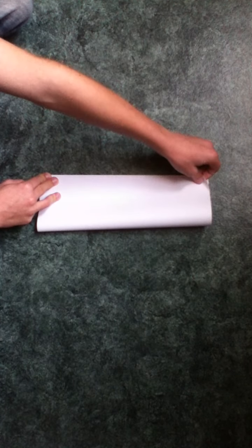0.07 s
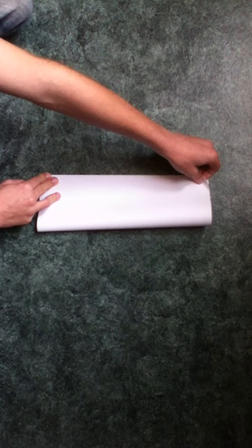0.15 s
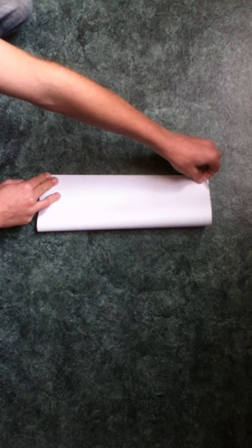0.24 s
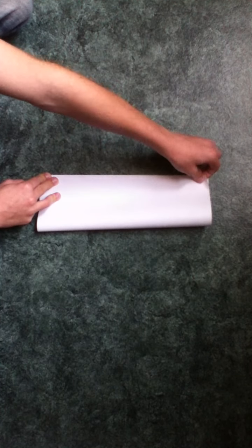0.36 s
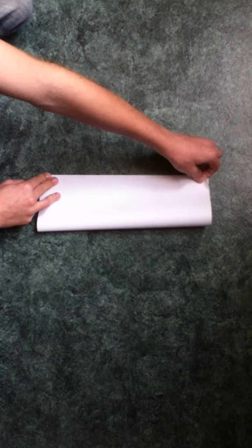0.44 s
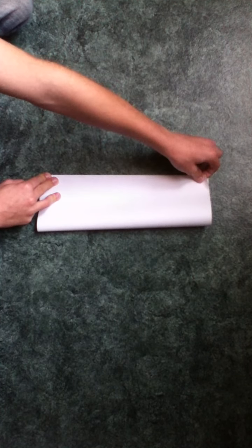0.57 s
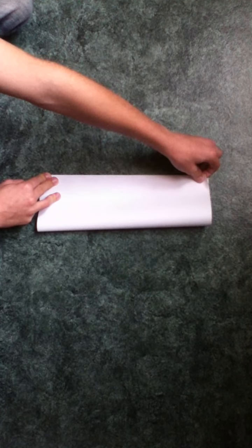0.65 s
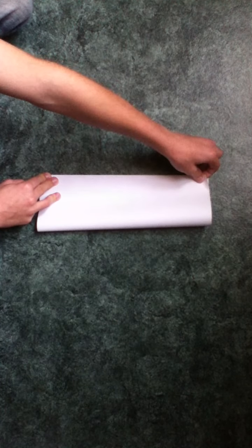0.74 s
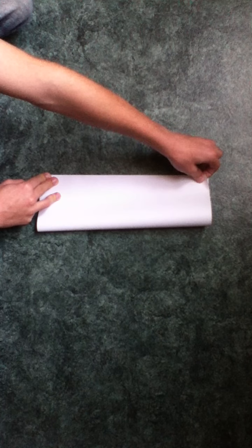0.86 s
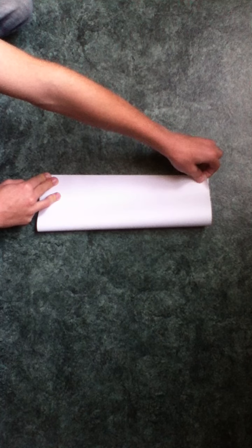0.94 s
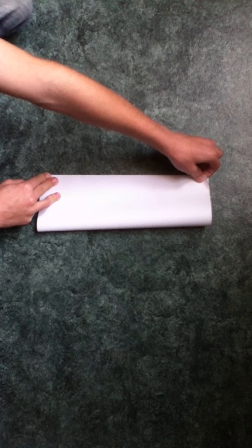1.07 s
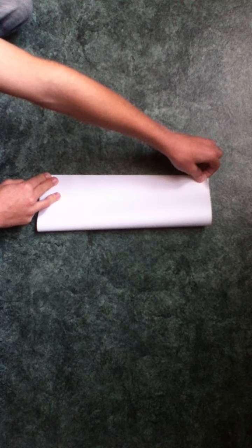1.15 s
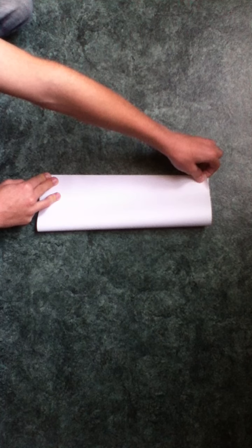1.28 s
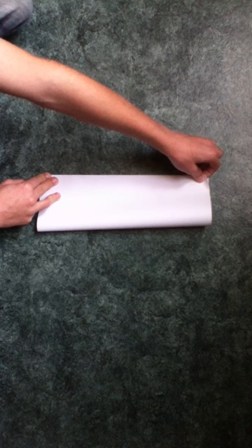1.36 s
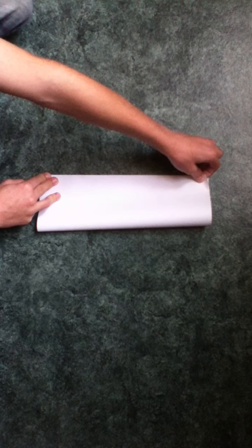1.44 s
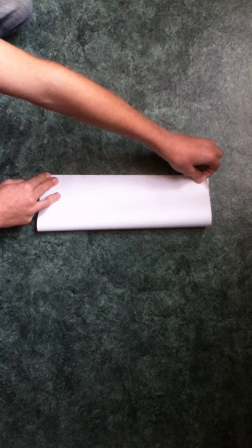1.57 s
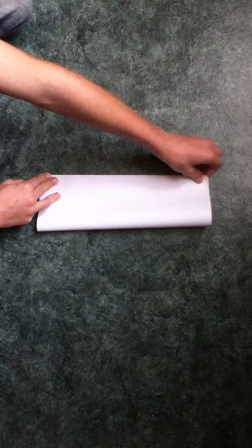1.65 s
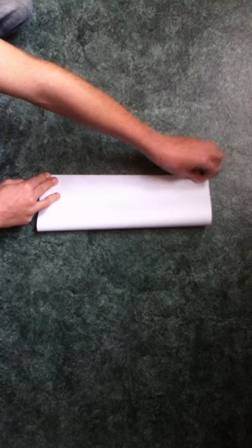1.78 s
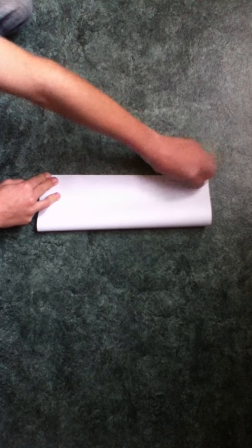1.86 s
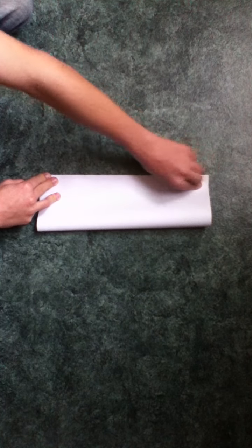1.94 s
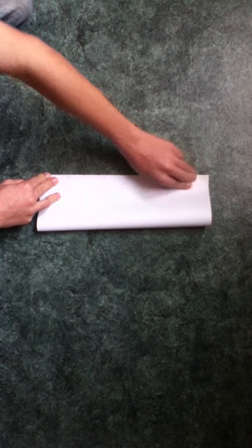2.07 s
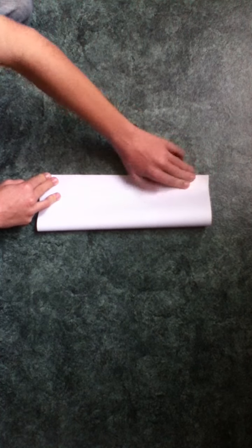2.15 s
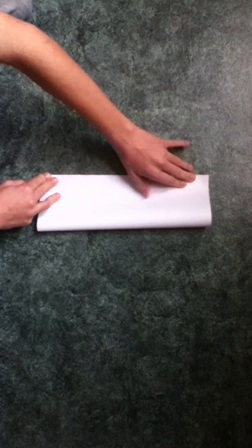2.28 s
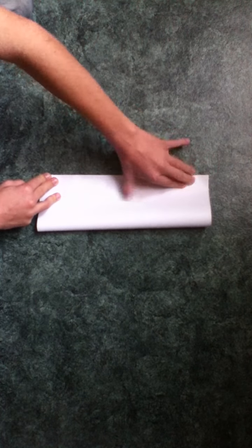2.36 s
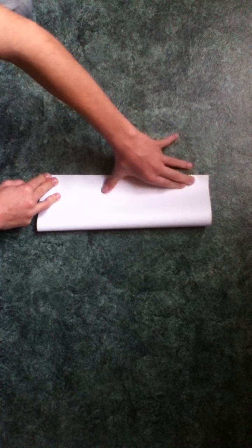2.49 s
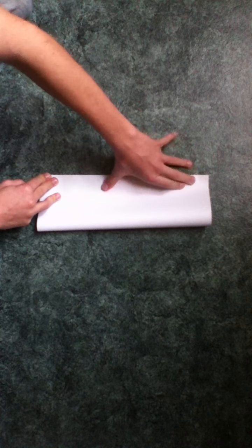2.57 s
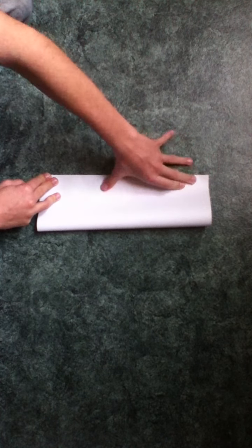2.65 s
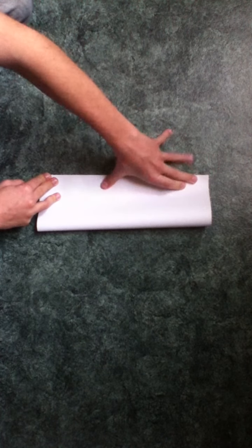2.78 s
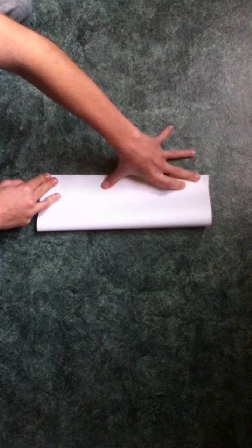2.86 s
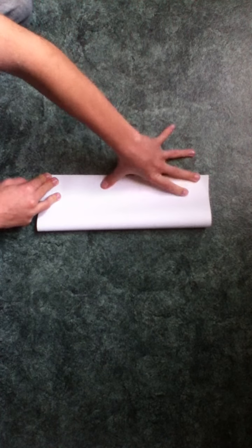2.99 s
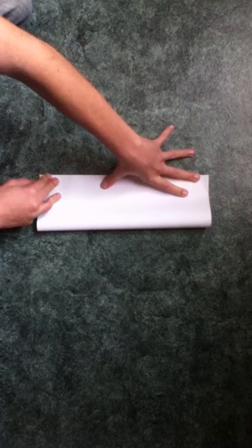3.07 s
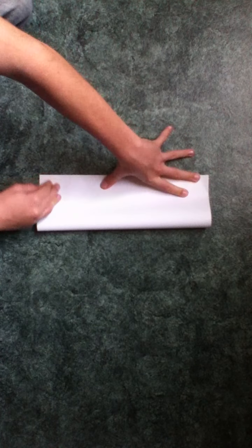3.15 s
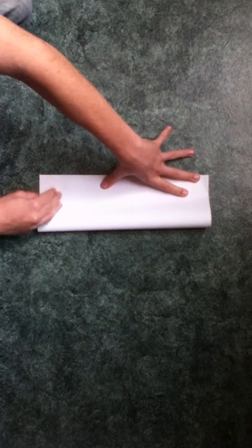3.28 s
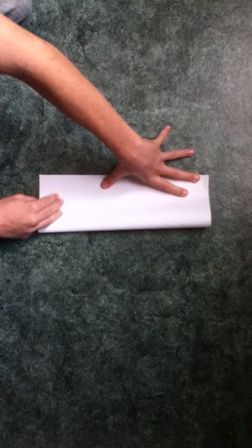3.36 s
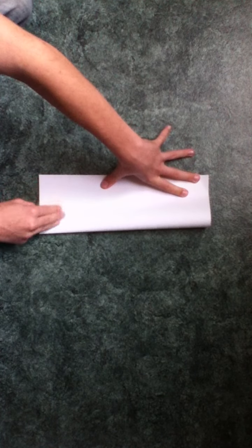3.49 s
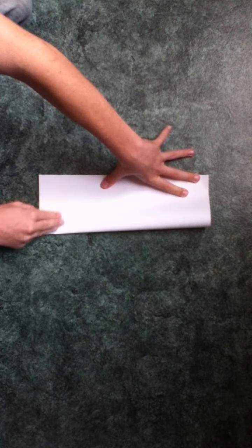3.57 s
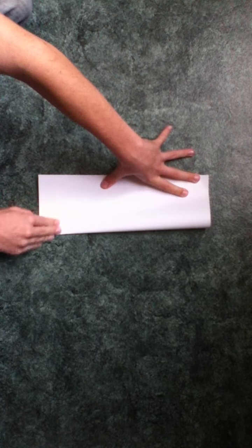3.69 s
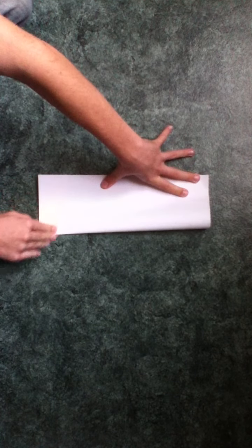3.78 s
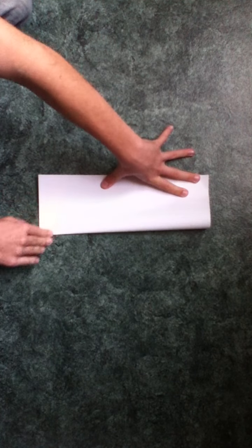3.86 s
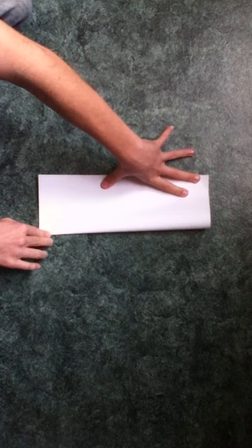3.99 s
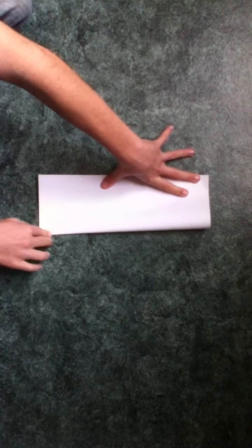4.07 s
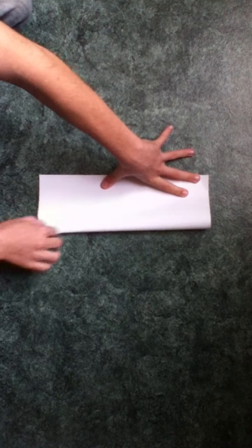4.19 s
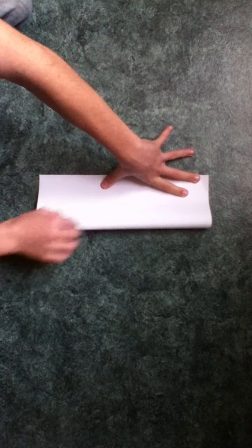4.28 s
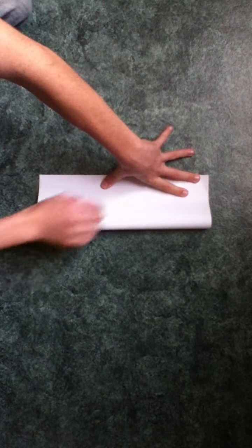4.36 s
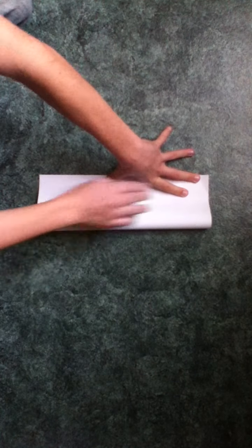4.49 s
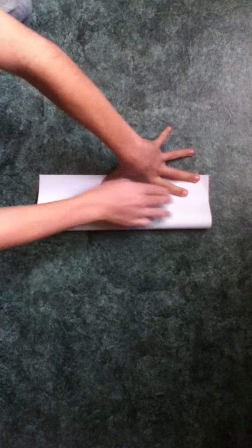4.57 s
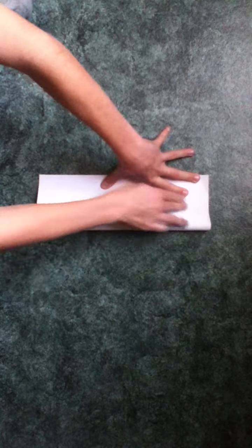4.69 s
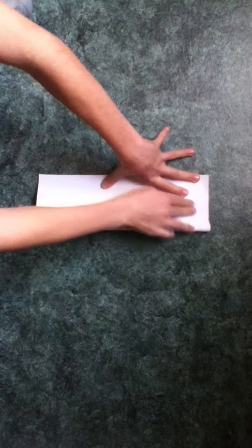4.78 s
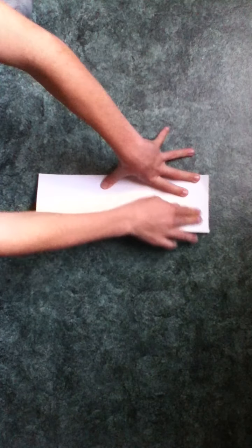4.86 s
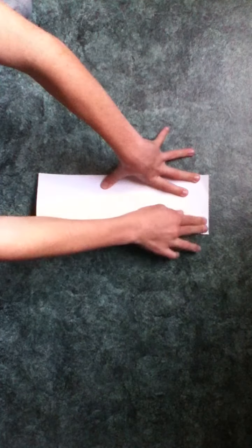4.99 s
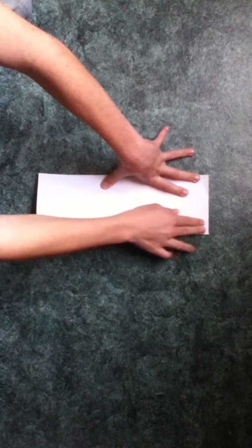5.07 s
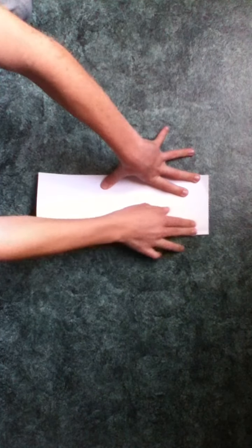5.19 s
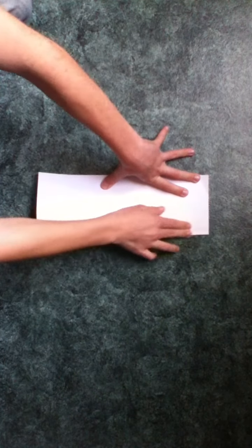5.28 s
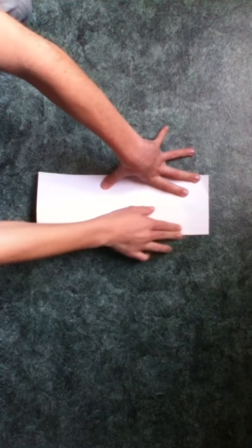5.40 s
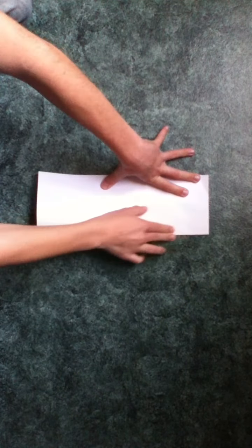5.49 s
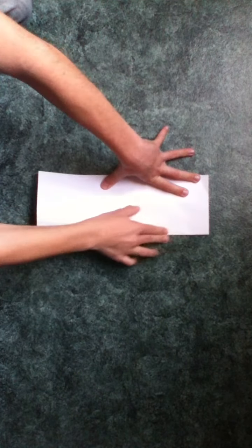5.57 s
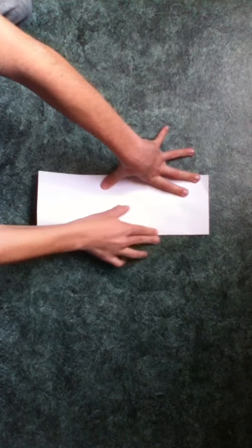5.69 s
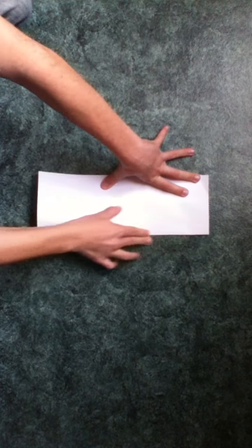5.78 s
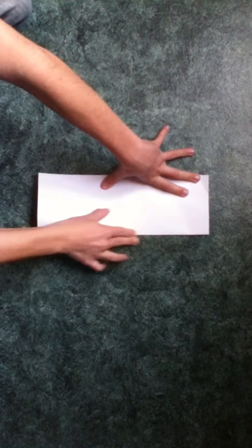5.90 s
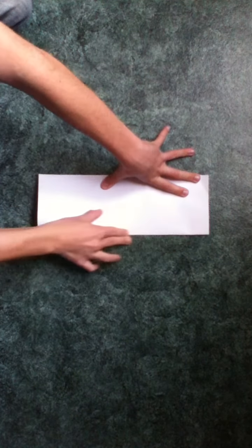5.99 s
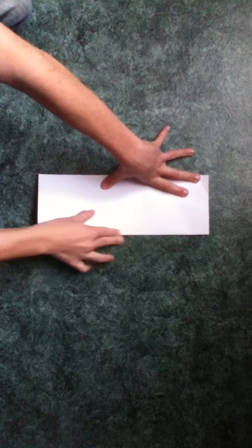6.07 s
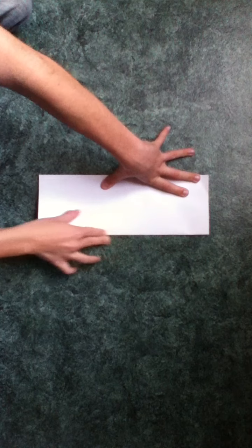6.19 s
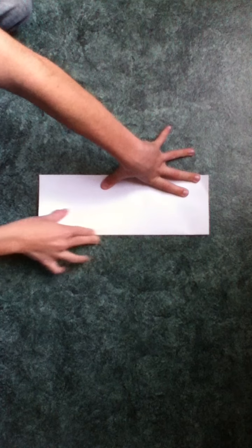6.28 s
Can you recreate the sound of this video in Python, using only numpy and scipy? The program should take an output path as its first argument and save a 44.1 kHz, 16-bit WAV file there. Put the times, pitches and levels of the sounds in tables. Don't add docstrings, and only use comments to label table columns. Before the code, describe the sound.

A close phone microphone in a small carpeted room, with low rumble, a faint building drone and light hiss throughout. At 0 s a soft fingertip push, then a quick brush at 0.2 s with small creaks. Mostly quiet until faint ticks around 0.7 and 1.3-1.45 s. At 1.65 s a bright, sharp snap with a dull thump, another lower snap at 1.83 s, then hissing slides and hollow paper drumming from 1.85 to 2.5 s. Lighter brushes and an airy flick near 3 s, a creak at 3.2 s, then overlapping rubs to 3.9 s. A crisp crease at 3.7 s, the loudest crack at 3.93 s, and a firm push with another hard snap at 4.18 s, each with a short room echo. A low soft thump at 4.55 s, tiny clicks at 4.64 s, then short slides and long, gentle smoothing hisses until 6.4 s, with one faint creak at 5.7 s.

```python
import sys
import numpy as np
from scipy import signal
from scipy.fft import rfft, irfft
from scipy.io import wavfile
from scipy.ndimage import uniform_filter1d

SR = 44100
rng = np.random.default_rng(int(sys.argv[2]) if len(sys.argv) > 2 else 0)


def digitize_waveform(pressure):
    field = np.atleast_2d(pressure).T
    bounded = np.clip(field, -1, 1)
    quanta = np.round(bounded * 32767).astype(np.int16)
    wavfile.write(sys.argv[1], SR, quanta)


def elevation(decibels):
    levels = np.asarray(decibels, float)
    return 10 ** (levels / 20)


N = 279594

# (frequency [Hz], density [dB per Hz])
SKIN_HISS = [(1760, -16.5), (3000, -9), (3940, -7), (4610, -2.5), (6250, -2), (7440, -3.5), (8900, -2.5),
             (11000, -18.5), (14300, -70), (22000, -120)]
# (frequency [Hz], density [dB per Hz])
SKIN_FIZZ = [(8000, -23), (10000, -4.5), (11500, -3), (13000, -4), (14500, -9), (16000, -15)]
# (frequency [Hz], width [Hz], level [dB])
SHEET_MODES = [(1320, 450, 6), (1590, 490, 12.5), (1970, 300, 10), (2300, 760, 13), (2750, 710, -4)]
# (time [s], pitch [Hz])
FREE_PANEL = [(0.23, 1720), (0.3, 1300), (1.45, 1300), (1.6, 1850), (1.7, 1490), (2.05, 1860), (2.15, 1540),
              (2.23, 1300), (2.37, 1340), (2.45, 1780), (3.19, 1790), (3.3, 1600), (3.56, 2420),
              (3.75, 1810), (4.6, 2000), (4.85, 2170), (5.2, 2350), (5.35, 2000)]
SKIN_HZ, LARGE_PANEL_HZ = 5770, 1460
SHEET_LOW_HZ = 1050


def rubbing():
    sheet_level, hiss_level, whistle_level, fizz_level = strokes()
    fine, coarse = slips(20000, .9, 0.17), slips(5000, 1.8, 0.24)
    hiss = coloured(fine, SKIN_HISS)
    fizz = coloured(fine, SKIN_FIZZ)
    whistle = evened(sweep(fine, np.full(N, SKIN_HZ), 2660))
    held = sum(elevation(db) * resonate(resonate(coarse, hz, w), hz, 3 * w) for hz, w, db in SHEET_MODES)

    free_hz = np.interp(np.arange(N) / SR, *np.transpose(FREE_PANEL))
    free = evened(sweep(coarse, free_hz, 890))
    large = np.clip((LARGE_PANEL_HZ - free_hz) / 150, 0, 1)
    clear = large * evened(sweep(coarse, free_hz, 170))
    panels = evened(held) + elevation(-4.5) * free + elevation(-5.0) * clear
    panels = signal.sosfilt(signal.butter(4, SHEET_LOW_HZ, "high", fs=SR, output="sos"), panels)

    rub = hiss_level * patchy(hiss, 0.65)
    rub += sheet_level * patchy(panels, 2.2)
    rub += fizz_level * patchy(fizz, 1.8)
    return rub + elevation(-9.0) * whistle_level * patchy(whistle, 1.7)


# (peak time [s], rise [s], fall [s], hiss level [dB], sheet drumming relative to hiss [dB])
PRESSES = [
    (0.024, 0.026, .05, -57.5, -2),
    (0.17, 0.13, .15, -64, 5),
    (1.39, 0.01, .16, -63, 4),
    (1.538, .045, 0.34, -55, -14),
    (1.788, .02, 0.2, -57.5, -8),
    (4.166, 0.0066, 0.065, -41.5, -23),
    (4.565, 0.13, .4, -54, -6),
]
# (peak time [s], rise [s], fall [s], hiss level [dB], sheet drumming relative to hiss [dB])
BRUSHES = [(0.21, 0.048, .035, -44.5, -11), (1.64, 0.032, 0.089, -52, -15), (2.154, 0.051, 0.12, -49, 1.5),
           (2.29, 0.14, 0.12, -56, 10.5), (2.405, 0.091, 0.29, -53, -24), (2.526, .02, 0.081, -58, -11),
           (2.684, 0.05, 0.084, -57.5, -18), (2.82, .25, 0.029, -60.5, -13),
           (2.915, 0.0057, 0.16, -47, -31), (2.97, 0.11, 0.11, -63, 1.5), (4.128, 0.055, 0.039, -54, 2.5),
           (4.2, 0.069, .1, -51.5, 5.5), (4.7, .05, .2, -58, -15), (5.436, 0.29, 0.2, -53, -11)]
# (peak time [s], rise [s], fall [s], hiss level [dB], sheet
# drumming relative to hiss [dB])
SKIMS = [
    (3.033, 0.04, 0.014, -53.5, -1),
    (3.14, 0.1, 0.12, -56.5, -23),
]
# (start [s], end [s], hiss at start [dB], hiss at end [dB], sheet drumming relative to hiss [dB])
SLIDES = [(1.686, 1.77, -66, -70, 0), (1.844, 2.15, -59, -51.5, -9), (2.251, 2.386, -51.5, -52.5, -5.5),
          (3.15, 3.193, -64, -53, -23), (3.2, 3.343, -48, -49.5, -1.5), (3.366, 3.524, -52.5, -49.5, -0.5),
          (3.547, 3.808, -50, -54, -8.5), (3.804, 3.91, -59, -60, -10), (4.664, 4.726, -55, -56, -7),
          (4.748, 4.855, -53.5, -53.5, -8), (4.868, 4.961, -55.5, -56, -3),
          (5.012, 5.517, -55, -57.5, -5.5), (5.537, 6.4, -56, -56, -9)]
# broad hiss [dB], skin whistle [dB], fizz [dB]
PRESS_DB, BRUSH_DB, SKIM_DB, SLIDE_DB = (-5.5, 1.5, -18), (0.3, -4.5, -7), (-.3, .3, 2.5), (-1, -0.7, -6)
SWELL_DB, EDGE_S = 23, 0.04


def strokes():
    t, power = np.arange(0, N / SR + .002, .002), 0
    for table, kind_db in [(PRESSES, PRESS_DB), (BRUSHES, BRUSH_DB), (SKIMS, SKIM_DB)]:
        for s, rise, fall, db, sheet_db in table:
            swell_db = db - SWELL_DB * np.maximum((s - t) / rise, (t - s) / fall)
            power += np.outer(elevation([sheet_db, *kind_db]), elevation(swell_db)) ** 2
    for start, end, from_db, to_db, sheet_db in SLIDES:
        off = np.maximum(np.maximum(start - t, t - end), 0) / EDGE_S
        slide_db = np.interp(t, [start, end], [from_db, to_db]) - SWELL_DB * off
        power += np.outer(elevation([sheet_db, *SLIDE_DB]), elevation(slide_db)) ** 2
    return [np.interp(np.arange(N) / SR, t, np.sqrt(p)) for p in power]


def slips(per_s, spread_db, flutter_db):
    sizes = elevation(spread_db * np.minimum(rng.exponential(1, N), 4)) * rng.standard_normal(N)
    clumps = evened(uniform_filter1d(uniform_filter1d(rng.standard_normal(N), size=700), size=700))
    return sizes * (rng.random(N) < per_s / SR) * elevation(flutter_db * clumps)


def patchy(x, patchy_db):
    z = signal.stft(x, nperseg=512)[2]
    field = rng.standard_normal(z.shape)
    field = evened(uniform_filter1d(uniform_filter1d(field, size=7, axis=0), size=12, axis=1))
    return evened(signal.istft(z * elevation(patchy_db * field), nperseg=512)[1][:N])


# (time [s], peak level [dB], panel pitch [Hz], room share [dB])
CREAKS = [(0.231, -43.5, 1120, -3), (0.284, -47.5, 1050, 2.5), (0.688, -45, 999, -0.5),
          (1.293, -49, 1190, 1), (1.389, -50, 1190, 5), (1.445, -44.5, 1220, -3), (1.788, -51, 1280, 3),
          (2.914, -52, 1200, 7), (3.019, -49, 1970, 9), (3.188, -36, 1580, 10), (4.129, -39.5, 1470, 4.5),
          (5.719, -46, 1700, -12)]
# (time [s], peak level [dB], panel pitch [Hz], crack share [dB], room share [dB])
BUCKLES = [(1.6526, -21, 7150, -18, -12), (1.6527, -30, 12500, -15, -7), (1.6532, -35.5, 1040, -22, -7.5),
           (1.6543, -27, 4500, -13, -4), (1.8262, -31, 1156, -8, -5.5), (1.8275, -34.5, 2750, -8, 0),
           (1.8295, -34, 1280, -31, -24), (1.841, -37, 1050, -25, -21), (3.6983, -35.5, 1030, -22, -6.5),
           (3.7011, -26, 2030, -10, 1.5), (3.9321, -12.5, 1425, -2, -4.5), (3.9331, -18.5, 2080, -16, 5),
           (3.9347, -15.5, 2750, -3.5, 1), (2.8942, -39, 6000, -15, -11), (3.6995, -38, 2350, -20, -8),
           (3.0815, -40.5, 6100, -15, -9), (3.198, -31.5, 2000, -20, -4), (4.5548, -45.5, 950, -20, -2),
           (4.6352, -40, 1220, -20, 0), (4.6355, -41, 2400, -20, -9), (4.1797, -20, 1490, -2.5, -4.5),
           (4.1776, -17.5, 2600, -17, -4.5), (4.178, -31.5, 920, -20, -7.5), (4.177, -23, 3750, -20, 4)]
CREAK_WIDTH_HZ, CREAK_CRACK_DB, CRACK_DB_PER_OCTAVE = 580, 2, -7
WIDTH_SHARE = 0.47


def snaps():
    near, far, t = np.zeros(N), np.zeros((3, N)), np.arange(1500) / SR
    first_kick = 1. * (t == 0)
    rush = .2 * np.exp(-t / .0008)
    rows = []
    for s, db, hz, room_db in CREAKS:
        crack_db = CREAK_CRACK_DB + CRACK_DB_PER_OCTAVE * np.log2(hz / 1000)
        rows.append((s, db, hz, CREAK_WIDTH_HZ, crack_db, room_db))
    for s, db, hz, crack_db, room_db in BUCKLES:
        rows.append((s, db, hz, WIDTH_SHARE * hz, crack_db, room_db))
    for k, (s, db, hz, width, crack_db, room_db) in enumerate(rows):
        at = round(s * SR)
        kicks = first_kick + rng.standard_normal(1500) * rush
        near[at:at + 1500] += elevation(db) * buckle(kicks, hz, width, crack_db)
        far[k % 3, at:at + 1500] += elevation(db + room_db) * buckle(first_kick, hz, width, crack_db + 3.5)
    return near, far


# (frequency [Hz], width [Hz], level [dB])
FIBRE_CRACK = [(5010, 1700, 16), (6100, 420, 14), (8000, 350, 5)]


def buckle(kicks, panel_hz, width, crack_db):
    panel = resonate(resonate(kicks, panel_hz, width), panel_hz, 0.84 * width)
    crack = sum(elevation(db) * resonate(resonate(kicks, hz, w), hz, w) for hz, w, db in FIBRE_CRACK)
    sound = panel / abs(panel).max() + elevation(crack_db) * crack / abs(crack).max()
    return sound / abs(sound).max()


# (time [s], peak level [dB], pitch [Hz])
THUMPS = [
    (1.653, -43, 597),
    (1.826, -40, 450),
    (3.698, -40.5, 426),
    (3.932, -41.5, 460),
    (4.177, -42, 400),
    (4.545, -40, 317),
]


def landings():
    out, t = np.zeros(N), np.arange(1500) / SR
    for s, db, hz in THUMPS:
        out[round(s * SR):][:1500] += elevation(db) * np.sin(2 * np.pi * hz * t) * np.exp(-t * hz * 1.5)
    return out


# (frequency [Hz], t60 [s])
ROOM_T60 = [(400, 0.26), (1300, 0.24), (3500, 0.34), (9000, 0.19), (15000, 0.033)]
# (frequency [Hz], level [dB])
ROOM_TONE = [(300, -5), (1000, 3.5), (3000, -10.5), (6000, -8), (12000, 5.5)]


def room(x):
    taps = np.zeros(SR // 2)
    at = np.arange(150, len(taps) - 20, 20)
    taps[at + rng.integers(0, 20, len(at))] = rng.choice([-1., 1.], len(at))
    hz, t, z = signal.stft(taps, SR, nperseg=128)
    shape_db = read(ROOM_TONE, hz)[:, None] - 60 * t / read(ROOM_T60, hz)[:, None]
    tail = signal.istft(z * elevation(shape_db), SR, nperseg=128)[1]
    return signal.fftconvolve(x, tail / np.linalg.norm(tail))[:N]


# (frequency [Hz], density [dB per Hz])
AIR_COLOUR = [(12, -14.5), (20, -1), (36, -3), (193, -15), (234, -17.5), (285, -19), (1090, -27.5),
              (1570, -28.5), (1910, -29), (2600, -29), (3340, -29.5), (5230, -30), (16000, -34.5)]
AIR_DB = -55
DRONE_HZ, DRONE_WIDTH_HZ, DRONE_DB = 47.4, 1.9, -61.5


def air():
    drone = evened(resonate(rng.standard_normal(N), DRONE_HZ, DRONE_WIDTH_HZ))
    return elevation(AIR_DB) * coloured(rng.standard_normal(N), AIR_COLOUR) + elevation(DRONE_DB) * drone


def evened(x):
    return x / np.sqrt(np.mean(x ** 2) + 1e-20)


def read(points, hz):
    f, value = np.transpose(points)
    return np.interp(np.log(hz + 1), np.log(f + 1), value)


def coloured(x, points):
    gain = elevation(read(points, np.fft.rfftfreq(N, 1 / SR)))
    return evened(irfft(rfft(x) * gain, N))


def resonate(x, hz, width):
    r = np.exp(-np.pi * width / SR)
    return signal.lfilter([1 - r, 0, r - 1], [1, -2 * r * np.cos(2 * np.pi * hz / SR), r * r], x)


def sweep(x, hz, width):
    turn, r = np.exp(2j * np.pi * np.cumsum(hz) / SR), np.exp(-np.pi * width / SR)
    return 2 * (turn * signal.lfilter([(1 - r) ** 2], np.poly([r, r]), x / turn)).real


RUB_ROOM_DB = -8


def scene():
    rub = rubbing()
    near, far = snaps()
    thumps = landings()
    echo = room(far[0] + thumps + elevation(RUB_ROOM_DB) * rub) + room(far[1]) + room(far[2])
    mono = rub + near + thumps + echo + air()
    return np.array([mono, mono])


PATCHES_PER_S, PATCH_LOW_HZ, PATCH_TOP_HZ, PATCH_WIDTH_HZ = 4.5, 4100, 13500, 1600


def channel_pair(mono):
    hz, t, z = signal.stft(mono, SR, nperseg=1024, noverlap=768)
    power = (abs(z[hz > 900]) ** 2).sum(0)
    loud_db = 10 * np.log10(uniform_filter1d(power, size=3, origin=1) + 1e-12)
    luck = rng.standard_normal(z.shape)
    luck = evened(uniform_filter1d(uniform_filter1d(luck, size=6, axis=0), size=9, axis=1))
    z = z * (hz[:, None] < 17500 - 150 * (loud_db + 60) + 1300 * luck)

    when, where = rng.random((round(PATCHES_PER_S * N / SR), 2)).T
    lows = PATCH_LOW_HZ * (PATCH_TOP_HZ / PATCH_LOW_HZ) ** where
    patches = np.zeros(z.shape)
    for s, low in zip(when * N / SR, lows):
        patches += np.outer((hz > low) & (hz < low + PATCH_WIDTH_HZ), abs(t - s) < .012)
    side = elevation(1.5) * patches * z * np.exp(2j * np.pi * rng.random(z.shape))
    return signal.istft(np.array([z + side, z - side]), SR, nperseg=1024, noverlap=768)[1][:, :N]


def roll_off(x):
    return signal.sosfilt(signal.butter(12, 15800, fs=SR, output="sos"), x)


EDGE_HZ = 15800


def record(dry):
    edge = signal.firwin(1023, EDGE_HZ, window=("kaiser", 9), fs=SR)
    mono = signal.oaconvolve(dry[0], edge, "same")
    mix = channel_pair(mono)
    return roll_off(mix)


dry = scene()
out = record(dry)
digitize_waveform(out)
```